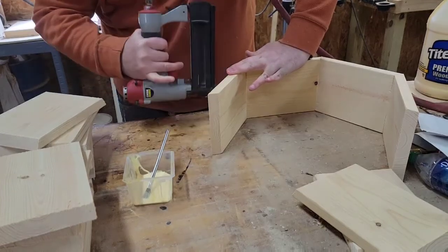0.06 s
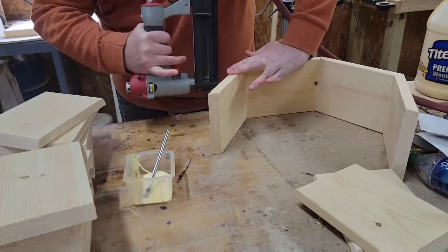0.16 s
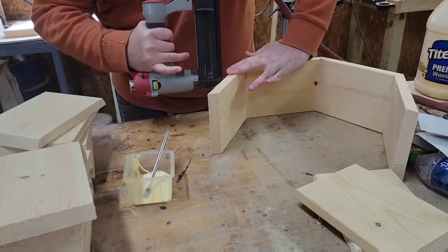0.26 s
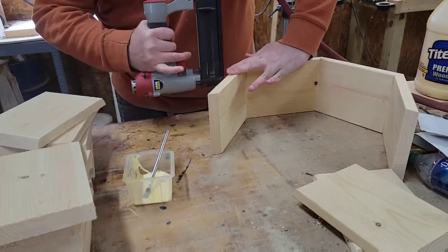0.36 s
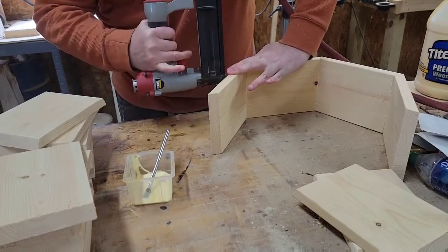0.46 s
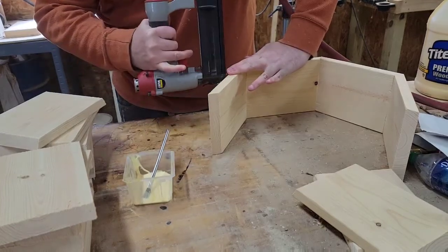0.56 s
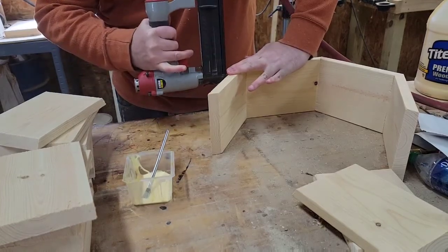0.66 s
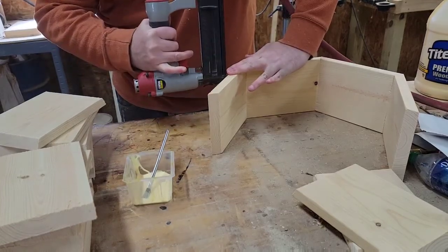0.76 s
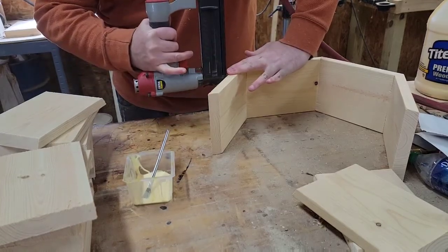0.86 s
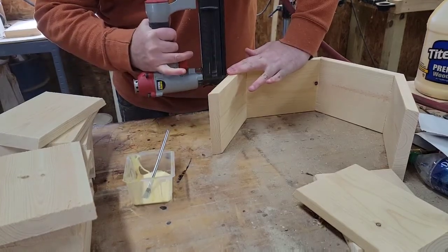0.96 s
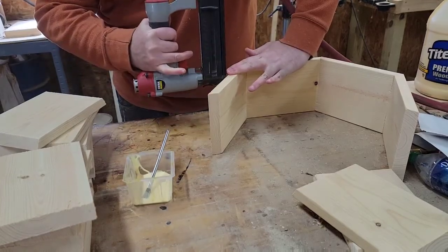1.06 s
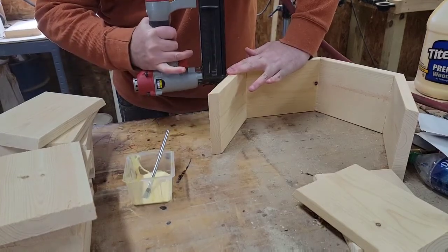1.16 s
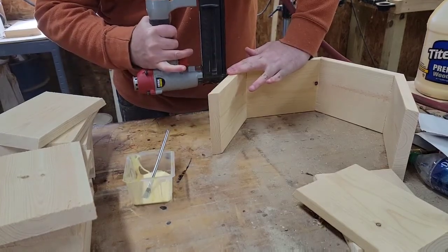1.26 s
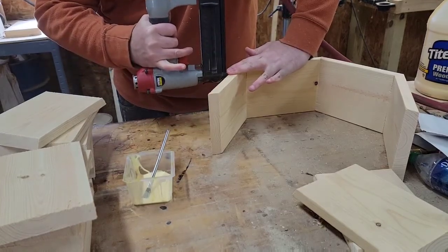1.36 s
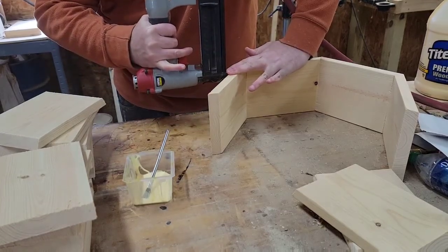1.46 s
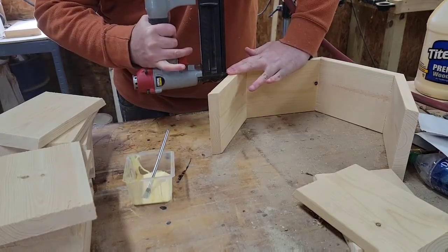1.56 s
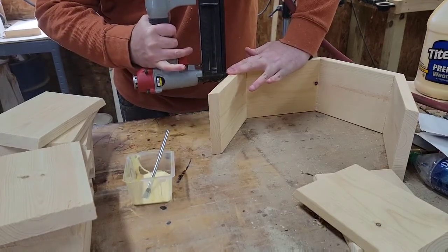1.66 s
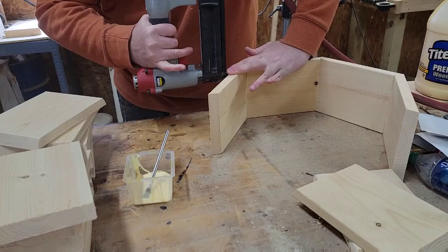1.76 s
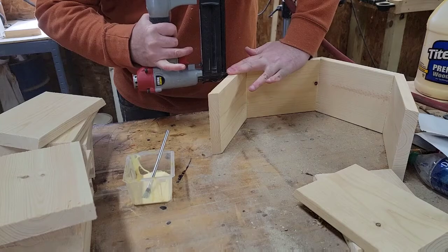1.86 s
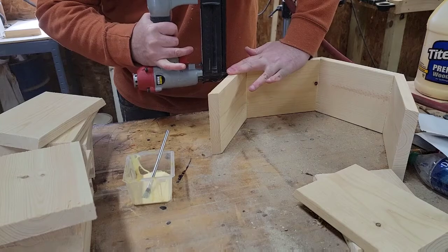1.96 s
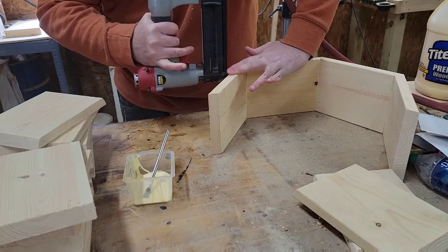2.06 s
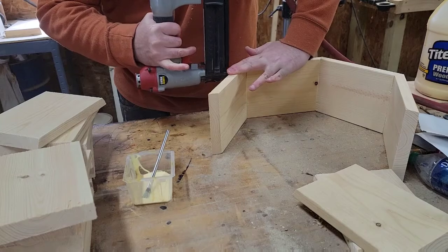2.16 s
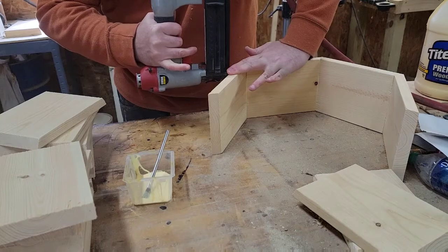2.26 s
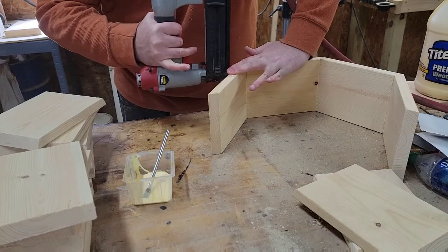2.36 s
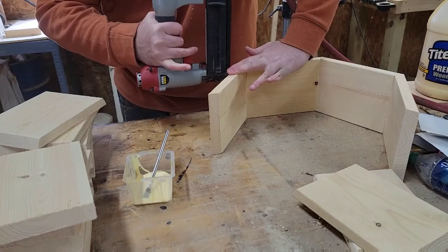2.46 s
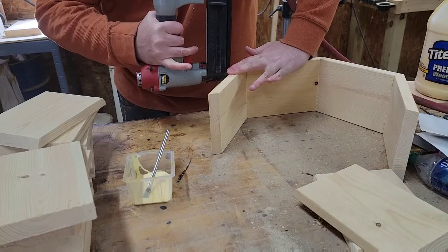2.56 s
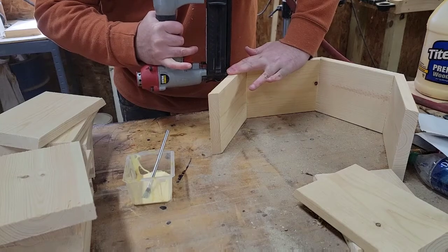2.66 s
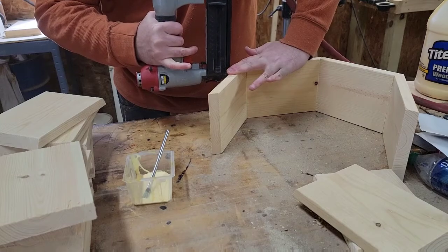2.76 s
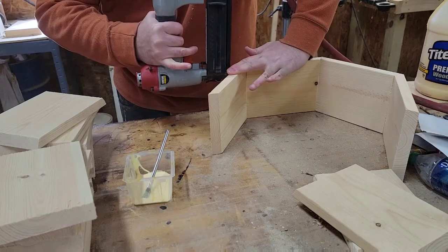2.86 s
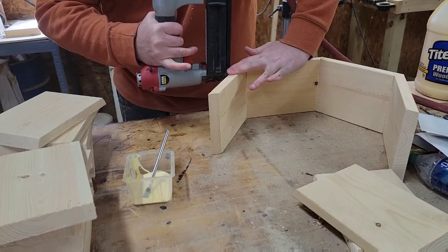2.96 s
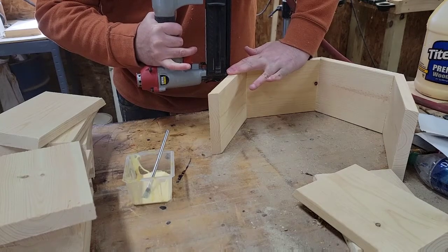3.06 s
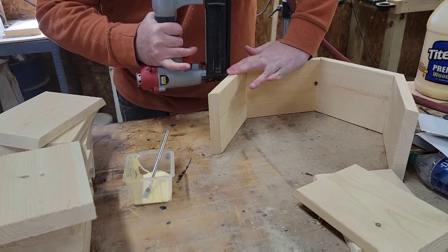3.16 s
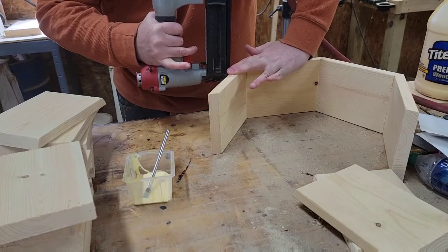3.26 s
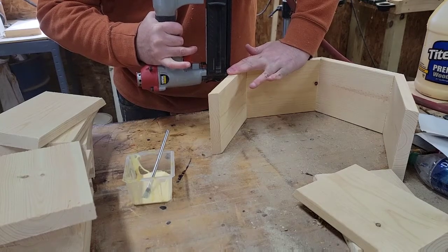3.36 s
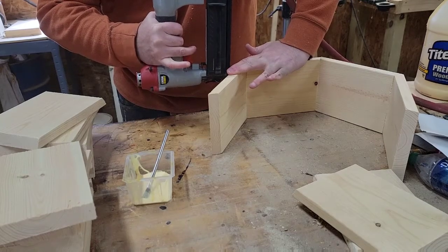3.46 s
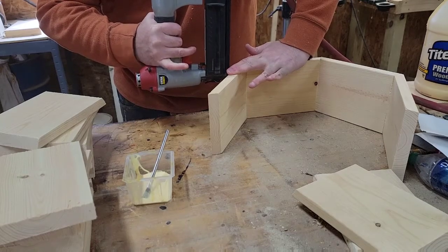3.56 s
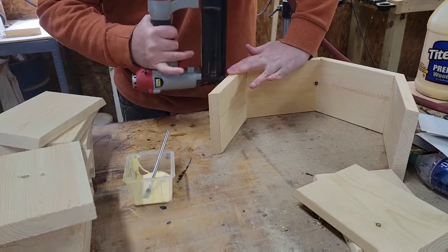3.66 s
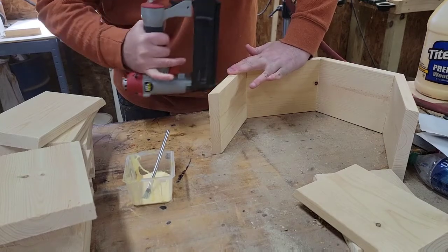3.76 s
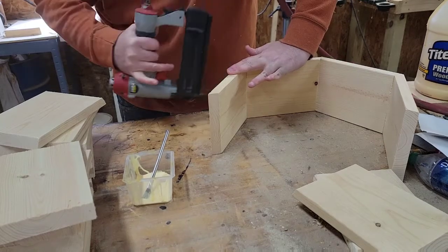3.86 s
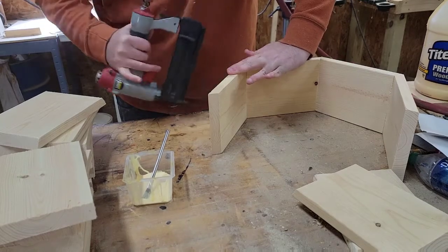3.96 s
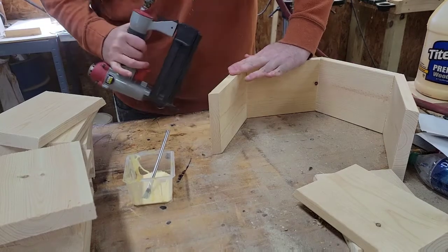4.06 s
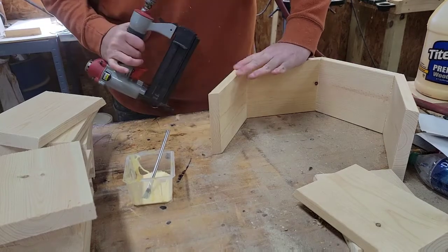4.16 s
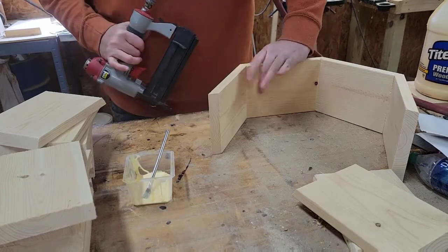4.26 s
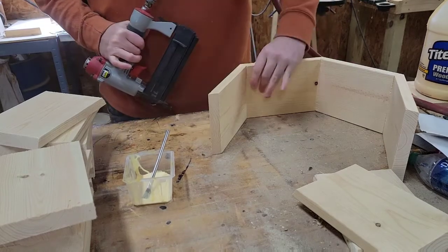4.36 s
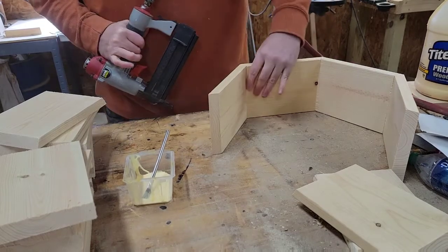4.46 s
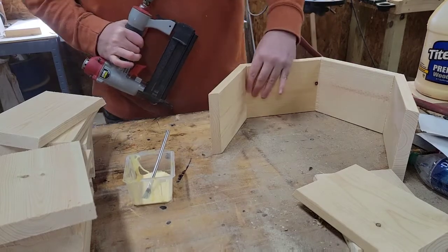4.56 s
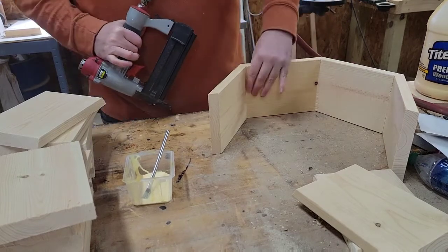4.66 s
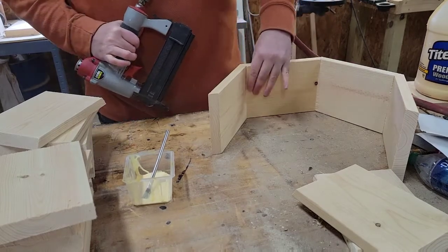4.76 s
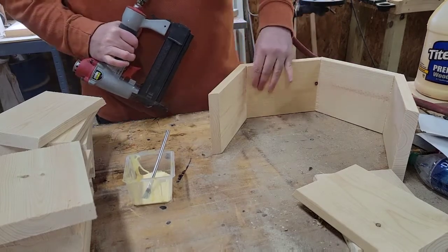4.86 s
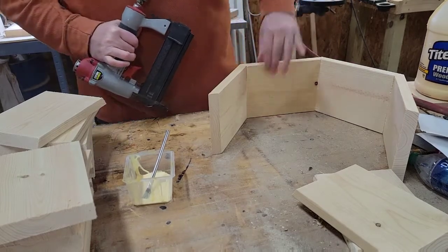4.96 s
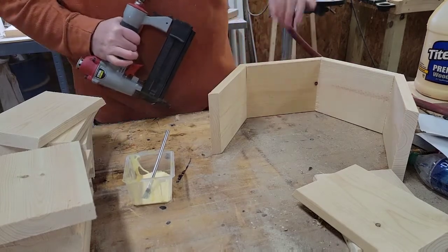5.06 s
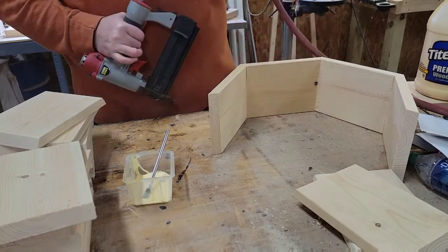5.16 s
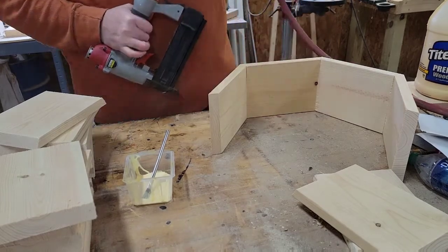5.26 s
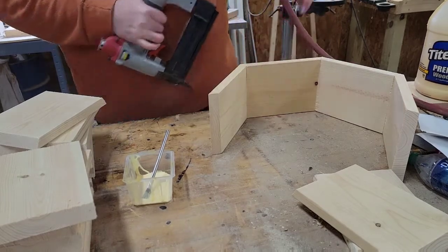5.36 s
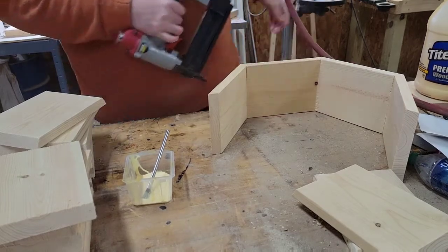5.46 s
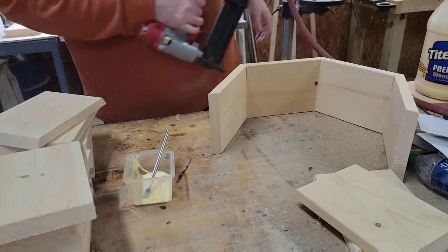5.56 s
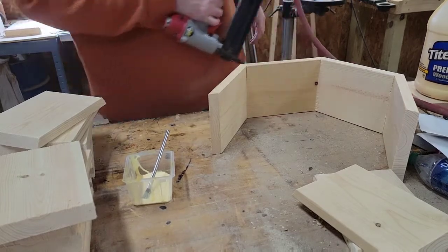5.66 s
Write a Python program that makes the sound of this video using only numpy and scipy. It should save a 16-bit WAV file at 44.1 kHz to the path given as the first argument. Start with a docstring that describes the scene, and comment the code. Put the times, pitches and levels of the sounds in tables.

```python
"""Pneumatic nailing in a reverberant workshop

An air nailer drives a brad into a pine box on a bench in a ringing workshop, as the shot before dies away.
Shaped noise forms the air at valve and exhaust; damped modes ring under the driver and the landing piston.
Between shots a jet of leaking air hisses and whistles, the nose taps the boards, and a hand brushes the wood.
Wall echoes and a decaying diffuse tail surround the impacts, over a low rumble of filtered noise."""
import sys
import numpy as np
from scipy import signal
from scipy.fft import rfft, irfft
from scipy.io import wavfile

SR = 44100
rng = np.random.default_rng(int(sys.argv[2]) if len(sys.argv) > 2 else 0)


def digitize_waveform(pressure):
    """Quantize a signal to 16-bit integers and store it at the path in sys.argv[1].

    Rows of a 2-D input are taken as channels; values are limited to [-1, 1].
    """
    field = np.atleast_2d(pressure).T
    bounded = np.clip(field, -1, 1)
    quanta = np.round(bounded * 32767).astype(np.int16)
    wavfile.write(sys.argv[1], SR, quanta)


N = 252252
TIME = np.arange(N) / SR
FREQS = np.fft.rfftfreq(N, 1 / SR)

# Levels are relative. Colours give spectral level in equal-width bands; noise is then scaled to unit rms.
# Strike tilts pivot at 1 kHz. T60 is the time to decay by 60 dB.

# air at the trigger valve: (full at [s], level [dB], attack [s], hold [s], release [s])
VALVE_AIR = (3.503, -13, .086, .004, .1)
# its colour: (frequency [Hz], level [dB])
VALVE_COLOUR = [(100, -8), (500, -16), (1400, -20.5), (3200, -13.5), (5200, -9), (6300, -5), (7500, -3),
                (9000, -7), (11500, -12), (14000, -9), (15200, -9)]
# the narrowest slits squeal: (full at [s], level [dB], attack [s], hold [s], release [s])
SLIT_SQUEALS = [(3.493, -17.8, .078, .008, .07), (3.682, -24, .044, .038, .03)]
# their colour: (frequency [Hz], level [dB])
SQUEAL_COLOUR = [(5000, -49.5), (11000, -22), (12600, -10.5), (14200, -10.5), (15200, -0.5), (16000, -7.5)]
# driver and nail strike the board: (time [s], level [dB], tilt [dB per octave])
DRIVER_BLOWS = [(3.5175, -12, 1.5), (3.5208, -6.5, 1.5), (3.5252, 5.6, 1), (3.5283, -8.5, 3.5),
                (3.5297, -4.5, 3.5)]
# modes of board and bench: (frequency [Hz], level [dB], T60 [s])
BOARD_MODES = [(92, -29, .15), (232, -27.5, .05), (317, -21.5, 0.03), (410, -19, .026), (546, -19.5, .034),
               (685, -20, 0.03), (756, -6.8, 0.016), (982, -7.5, 0.015), (1047, -19.5, .045),
               (1153, -26, 0.037), (1283, -18, .025), (1463, -20.5, 0.014), (1700, -20.5, .016),
               (2400, -20, 0.009), (3000, -21, .008), (3800, -15.5, 0.0075)]
# boards and tools around the bench ring on: (frequency [Hz], level [dB], T60 [s])
SYMPATHETIC_MODES = [(228, -43, .7), (546, -41, .7), (680, -39.5, .6), (769, -37, .55), (914, -34, .5),
                     (979, -30.5, .5), (1051, -29, .48), (1134, -31, .48), (1361, -34.5, .85),
                     (1438, -37.5, .8), (1657, -35, 1.0), (1986, -42, .9), (2503, -42, .8)]

# exhaust air, cut off as the piston lands: (full at [s], level [dB], attack [s], hold [s], release [s])
EXHAUST_AIR = (3.703, -12.6, .16, .013, .022)
# its colour: (frequency [Hz], level [dB])
EXHAUST_COLOUR = [(30, -10), (100, 0), (400, -4.5), (900, -2.5), (1600, 0.5), (2400, 0.5), (3700, -5),
                  (5200, -1), (7500, 0), (10000, -3.5), (13000, 2.5), (15200, 2.5)]
# valve and exhaust buffet the air: (time [s], height [dB])
AIR_PUFFS = [(3.504, -28), (3.6985, -20), (3.7138, -7.8)]
PUFF_S, PUFF_EDGE_S = .0033, .0018  # length of push and of suction; time to swing between them
# the piston knocks loose, lands on its stop and bounces: (time [s], level [dB], tilt [dB per octave])
PISTON_CLACKS = [(3.7053, -11, 2.5), (3.7183, 5.3, -.3), (3.7194, -3, 1.5), (3.7217, -6, 0)]
# modes of the metal tool body: (frequency [Hz], level [dB], T60 [s])
NAILER_MODES = [(267, -22.5, 0.021), (420, -19.5, 0.015), (1351, -24, 0.022), (1720, -15, 0.013),
                (2020, -19.5, .014), (2354, -16.5, 0.011), (2529, -34.5, 0.11), (2730, -14.5, .006),
                (3300, -16, 0.012), (3960, -28, 0.0079), (4400, -29, 0.016), (4810, -16, 0.017),
                (7150, -25, .012)]

# the nose is set on the box: (time [s], level [dB], tilt [dB per octave], thud of the bench [dB])
NOSE_TAPS = [(0.7606, -48.5, 3, -43), (0.7636, -45.5, 10.5, -62), (2.1995, -45, 4, -68),
             (2.9456, -46, -2.5, -70), (3.0117, -43, -2.5, -60)]
# the box rocks in soft contacts: (time [s], level [dB], tilt [dB per octave])
BOX_ROCKS = [(2.123, -64, -4), (2.189, -58, -6), (2.233, -63, -5), (2.277, -61, -5)]
# the nose skids: (full at [s], level [dB], attack [s], hold [s], release [s], tilt [dB per octave])
NOSE_SLIDES = [(0.768, -59, .02, .008, .14, 6.5), (2.2, -67, .15, .08, .3, -3)]
CATCHES_PER_S = 500
# modes of the loose box: (frequency [Hz], level [dB], T60 [s])
BOX_MODES = [(273.3, -17, 0.15), (390, -3, .046), (436.5, -2.5, 0.048), (516, -18, 0.051), (870, -2.5, .02),
             (1130, -0.5, 0.02), (1310, -9.5, 0.025), (1900, -15, .02), (2366, -14, .015),
             (3120, -24, .012)]
# modes of the bench top: (frequency [Hz], level [dB], T60 [s])
BENCH_MODES = [(90, -8, .3), (155.6, -7, 0.13), (245, -1, .055), (344, -3.5, 0.068)]
# light ticks as the fingers leave a board: (time [s], level [dB], tilt [dB per octave])
FINGER_TICKS = [(4.479, -53, -4), (4.714, -67, 11)]
# modes of the rim: (frequency [Hz], level [dB], T60 [s])
RIM_MODES = [(848, -2, .04), (1020, 2, .03), (1380, 0, 0.032), (1597, 1, .025), (2870, -2, 0.012)]
# a hand slides over the wood: (full at [s], level [dB], attack [s], hold [s], release [s])
HAND_BRUSH = (5.05, -62, .3, .045, .26)
# its colour: (frequency [Hz], level [dB])
BRUSH_COLOUR = [(400, -25), (900, -11), (1150, 4), (1500, -8), (3000, -6), (6000, -22)]

# the leak's hiss swells near 3-4.5 kHz at the end: (full at [s], level [dB], attack [s], hold [s], release [s])
HISS_SWELL = (5.67, -58.5, 1.2, .1, .3)
# its colour: (frequency [Hz], level [dB])
HISS_SWELL_COLOUR = [(80, -8), (170, 11), (400, -11), (1500, -19), (2400, -4), (3500, 3), (4500, 6),
                     (8000, -15)]
# colour of the leaking jet: (frequency [Hz], level [dB])
LEAK_COLOUR = [(300, -21), (700, -14), (1200, -8), (1900, -9.3), (2850, -6.3), (3350, -2.8), (3900, -3.6),
               (4700, 3.3), (6200, 2.5), (8000, 1.2), (9600, 0.3), (12000, -0.3), (13500, 3.7),
               (15300, 2.7)]
# breathy whistles: (frequency [Hz], width scale [Hz], level [dB], extra share of the sag after a shot)
LEAK_WHISTLES = [(5380, 340, -9, 0), (6990, 260, -9.2, .2), (7710, 220, -14.5, .2), (12480, 240, -16, .8),
                 (14750, 260, -12, .5)]
# the tool is turned in the hand: (time [s], level [dB])
TURNING_LEVEL = [(4.95, 0), (5.25, 1.6), (5.48, -1), (5.7, .5)]
# the leak: level without sag, scale of its sag after a shot, time of the drop, time constant of recovery
LEAK_DB, SAG_DB, SAG_S, RECOVERY_S = -42.8, 14.8, .12, 1.15
# the tool is drawn back from the box: when, how long it takes, and the change in the leak
DRAW_BACK_AT_S, DRAW_BACK_S, DRAW_BACK_DB = 3.75, .25, -3.7
# tilt of the whistles with the tool at the box and drawn back (dB per octave)
NEAR_TILT_DB, AWAY_TILT_DB = 2, -6
BENCH_ECHO_M, HAND_SWAY_M = .32, .015  # extra path of the echo off the bench; rms sway in the hand

# low rumble of the shop: (time [s], level [dB])
RUMBLE_LEVEL = [(0, -65.5), (2.5, -60), (5.72, -60)]
# its colour: (frequency [Hz], level [dB])
RUMBLE_COLOUR = [(20, -19.5), (40, -12.5), (55, -1.5), (90, 1.2), (125, -8.5), (170, -22.5), (280, -18),
                 (450, -27), (900, -27.5), (3000, -44)]

# reverberation of the shop: (frequency [Hz], level [dB], T60 [s])
SHOP_REVERB = [(42, -10, .5), (72, 1, .58), (150, -10, 0.68), (250, 1, .82), (420, 3.2, .85),
               (720, -4.3, 1.03), (1120, 2.2, .97), (1380, 4.4, 1.0), (1720, 7.4, 1.08), (2500, 2.8, 1.04),
               (5000, 1.1, 0.93), (7200, -0.3, 0.72), (9750, -2, 0.57), (13000, -3, 0.58),
               (15000, -2.6, 0.6)]
# first echoes from the nearest walls: (left ear delay [s], right ear delay [s], level [dB])
WALL_ECHOES = [(.0191, .0186, -19), (.0272, .0277, -19), (.0452, .0447, -21)]
# left-right correlation of noise: (frequency [Hz], correlation [-1 to 1])
NOISE_CORRELATION = [(28, .1), (60, .85), (130, 0.88), (290, 0.4), (700, -0.3), (1300, -.35), (3000, -0.3),
                     (7000, -0.18), (15000, 0.05)]
# left-right correlation of reverberation: (frequency [Hz], correlation [-1 to 1])
SHOP_CORRELATION = [(28, 0), (60, .7), (130, .88), (290, .5), (700, -.3), (1100, -.62), (2000, -.45),
                    (4000, -.3), (8000, -.17), (15000, -.12)]

PREVIOUS_SHOT_LEAD_S, CUTOFF_HZ = 4.0, 15650


def drive_stroke(right_ear_lag_s=.00028):
    """Turbulence and impact: the valve spits air, then the driver's blows excite the board's modes."""
    valve = in_shop(burst(VALVE_AIR, VALVE_COLOUR), wet_db=-1)
    squeal = in_shop(sum(burst(row, SQUEAL_COLOUR) for row in SLIT_SQUEALS), wet_db=-12)
    blows = 0
    for blow in DRIVER_BLOWS:
        impact = strikes([blow], BOARD_MODES, crack_db=-11, crack_t60=.014, crack_hz=5500, spread=.55)
        blows = blows + in_shop(impact, wet_db=0, bloom_db=5, bloom_s=.08)
    right = np.interp(TIME - right_ear_lag_s, TIME, blows[1])
    return valve + squeal + np.array([blows[0], right])


def sympathy(build_s=.04, spread=1.05):
    """Sympathetic resonance: lightly damped modes swell after the hardest blow, out of step at the ears."""
    hardest = max(DRIVER_BLOWS, key=lambda blow: blow[1])
    t = np.maximum(TIME - hardest[0], 0)
    out = 0
    for hz, db, t60 in SYMPATHETIC_MODES:
        side = rng.choice([-1, 1]) * np.array([[1], [-1]])
        skew = spread * min(hz / 700, 1) * side
        phase = 2 * np.pi * (hz * t + rng.random()) + skew
        out = out + from_db(db - 60 * t / t60) * np.sin(phase)
    return np.sqrt(2) * out * (1 - np.exp(-t / build_s))


def return_stroke():
    """Venting and impact: exhaust turbulence and pressure puffs, then the piston rings the metal body."""
    exhaust = in_shop(burst(EXHAUST_AIR, EXHAUST_COLOUR), wet_db=-4.7)
    buffets = in_shop(puffs(), wet_db=-6)
    clacks = 0
    for clack in PISTON_CLACKS:
        impact = strikes([clack], NAILER_MODES, crack_db=-5.5, crack_t60=.0065, crack_hz=7000,
                         spread=.93, contact_s=.0002)
        clacks = clacks + in_shop(impact, wet_db=-2.4)
    return exhaust + buffets + clacks


def puffs(ear_shift_s=.0004, lowest_hz=72):
    """Volume-flow radiation: each push is followed by suction, and a small port radiates no deep bass."""
    t = TIME + np.array([[ear_shift_s], [-ear_shift_s]])  # the left ear hears it first
    pressure = 0
    for s, db in AIR_PUFFS:
        swing = -np.tanh((t - s) / PUFF_EDGE_S)
        pressure = pressure + from_db(db) * swing * np.exp(-((t - s) / PUFF_S) ** 2)
    high_pass = signal.butter(2, lowest_hz, "high", fs=SR, output="sos")
    return signal.sosfilt(high_pass, pressure + 1e-18)


def handling():
    """Contact and friction: the nose jolts box and bench; later the free hand lets go and brushes the wood."""
    nose = [(s, db, tilt) for s, db, tilt, thud in NOSE_TAPS]
    jolts = [(s, thud, 0) for s, db, tilt, thud in NOSE_TAPS]
    taps = strikes(nose + BOX_ROCKS, BOX_MODES, crack_db=-16, crack_t60=.018, crack_hz=4000, spread=.26)
    thuds = strikes(jolts, BENCH_MODES, crack_db=-24, crack_t60=.04, crack_hz=3000, spread=.3)
    ticks = strikes(FINGER_TICKS, RIM_MODES, crack_db=-14, crack_t60=.015, crack_hz=4000, spread=.84)
    contacts = in_shop(taps + thuds + ticks + slides(), wet_db=-11)
    return contacts + burst(HAND_BRUSH, BRUSH_COLOUR)


def slides():
    """Stick-slip friction: the nose slips over the wood in many tiny uneven catches that ring the box."""
    out = 0
    for *event, tilt in NOSE_SLIDES:
        catches = (rng.random(N) < CATCHES_PER_S / SR) * rng.standard_normal(N)
        catch = strikes([(0, 0, tilt)], BOX_MODES, crack_db=-12, crack_t60=.01, crack_hz=3500, spread=.4)
        friction = signal.fftconvolve(catches[None], catch, axes=1)[:, :N]
        out = out + envelope(*event) * rms_one(friction)
    return out


def leak(hiss_db=-2.6, flutter_db=.62, whistle_flutter_db=1.5, swell_db=.6, waver=.007, wander=.005,
         echo_db=-13):
    """Jet noise: a thin jet hisses and sings with a bench echo; drawn back, it is softer and duller."""
    away = np.clip((TIME - DRAW_BACK_AT_S) / DRAW_BACK_S, 0, 1)
    tilt = NEAR_TILT_DB * (1 - away) + AWAY_TILT_DB * away
    sag = sag_db()
    jet = from_db(hiss_db) * coloured(LEAK_COLOUR)
    for hz, width, db, sags in LEAK_WHISTLES:
        pitch = hz * (1 + waver * drift(8) + wander * drift(1.2))
        phase = 2 * np.pi * np.cumsum(pitch) / SR
        lean = tilt * np.clip(np.log2(hz / 5800), -.5, .5)
        unsteady = whistle_flutter_db * drift(25) + swell_db * drift(3)
        jet = jet + narrow(phase, width) * from_db(db + lean - sags * sag + unsteady)
    late = TIME - (BENCH_ECHO_M + HAND_SWAY_M * drift(.5)) / 343  # speed of sound, m/s
    jet = jet + from_db(echo_db) * np.array([np.interp(late, TIME, ear) for ear in jet])
    loudness_db = LEAK_DB - sag + DRAW_BACK_DB * away + flutter_db * drift(32)
    return jet * level(TURNING_LEVEL) * from_db(loudness_db)


def hiss_swell():
    """Jet noise: at the end the leak's hiss swells near 3-4.5 kHz, as coloured noise under an envelope."""
    return burst(HISS_SWELL, HISS_SWELL_COLOUR)


def sag_db():
    """Relaxation: the hiss sinks quickly at each shot, then recovers exponentially."""
    leads = np.array([[0], [PREVIOUS_SHOT_LEAD_S]])
    since = np.maximum(TIME - VALVE_AIR[0] + leads, 0)
    return SAG_DB * np.sum(np.minimum(since / SAG_S, 1) * np.exp(-since / RECOVERY_S), axis=0)


def narrow(phase, width_hz):
    """Quadrature modulation: low-passed stereo noise is carried to a moving pitch."""
    half_width_hz = width_hz * .92  # half power this far either side of the pitch
    band = 1 / (1 + (FREQS / half_width_hz) ** 4) ** .5
    a, b = irfft(rfft(rng.standard_normal((2, 2, N))) * band, N)
    return rms_one(a * np.cos(phase) + b * np.sin(phase))


def rumble():
    """Broadband background: bass-heavy noise follows a slow level curve."""
    return level(RUMBLE_LEVEL) * coloured(RUMBLE_COLOUR)


def in_shop(x, wet_db, bloom_db=1.1, bloom_s=.08):
    """Superposition of direct and reverberant sound: a fresh diffuse tail each call, fixed wall echoes."""
    sounding = np.flatnonzero(np.abs(x[0]) > 1e-9)
    first, last = sounding[0], sounding[-1]
    response = shop_response(bloom_db, bloom_s)
    tail = signal.fftconvolve(x[:, first:last + 1], response, axes=1)[:, :N - first]
    tail = np.pad(tail, ((0, 0), (first, N - first - tail.shape[1])))
    return x + from_db(wet_db) * tail


def shop_response(bloom_db, bloom_s, gap_s=.018, build_s=.003, early_db=-11, grain_db=2.6, grain_s=.2,
                  size=65536, count=16):
    """Room impulse response: weak bench echoes, wall slaps, then a clumpy tail that decays by bands."""
    t, bins, out = TIME[:size], np.fft.rfftfreq(size, 1 / SR), 0
    field = stereo_spectrum(size, SHOP_CORRELATION) * from_db(at_hz(SHOP_REVERB, bins)) / np.sqrt(2)
    centres = np.geomspace(60, 15000, count)
    for hz, weights in zip(centres, np.eye(count)):
        band = irfft(field * np.interp(bins, centres, weights), size)  # overlapping bands
        out = out + band * from_db(-60 * t / at_hz(SHOP_REVERB, hz, axis=2))
    walls = .5 + .5 * np.tanh((t - gap_s) / build_s)
    onset = walls + from_db(early_db) * (1 - walls)
    far_walls = from_db(bloom_db * np.minimum(t / bloom_s, 1) ** 2)  # their echoes join in later
    clumps = from_db(grain_db * np.exp(-t / grain_s) * (drift(450, size) - .3))
    out = out * clumps * far_walls * onset / np.sqrt(SR / 10)
    for left_s, right_s, db in WALL_ECHOES:
        out[[0, 1], [round(left_s * SR), round(right_s * SR)]] += from_db(db)
    return out


def strikes(events, modes, crack_db, crack_t60, crack_hz, spread, contact_s=.00046, size=8192):
    """Modal excitation: each contact cracks and rings damped modes; tilt sets their treble balance."""
    out, t = np.zeros((2, N + size)), np.arange(size) / SR
    hz, mode_db, t60 = np.transpose(modes)[:, :, None]
    crack_edges = [1500, np.clip(crack_hz, 3000, 18000)]
    crack_band = signal.butter(1, crack_edges, "band", fs=SR, output="sos")
    # higher modes reach the two ears further out of step, up to 1 kHz (radians)
    skew = spread * np.minimum(hz / 1000, 1) * (-1) ** np.arange(len(hz))[:, None]
    for s, db, tilt in events:
        height = from_db(mode_db + tilt * np.log2(hz / 1000) - 60 * t / t60)
        phase = 2 * np.pi * hz * t
        ring = np.array([np.sum(height * np.sin(phase + ear * skew), axis=0) for ear in (1, -1)])
        ring = ring * (1 - np.exp(-t / contact_s))  # the force takes a moment to build
        grit = rng.standard_normal((2, size)) * from_db(-60 * t / crack_t60)
        crack = from_db(crack_db + 2 * tilt) * signal.sosfilt(crack_band, grit)
        start = round(s * SR)
        out[:, start:start + size] += from_db(db) * (ring + crack)
    return out[:, :N]


def burst(event, colour):
    """Amplitude modulation: coloured noise under an attack, hold and release."""
    return envelope(*event) * coloured(colour)


def envelope(full_s, db, attack_s, hold_s, release_s):
    """Exponential growth and decay: 60 dB up over the attack, a hold, 60 dB down over the release."""
    before = np.maximum((full_s - TIME) / attack_s, 0)
    after = np.maximum((TIME - full_s - hold_s) / release_s, 0)
    below = before + after
    return from_db(db - 60 * below) * (below < 1)


def coloured(colour):
    """Spectral shaping: stereo noise of unit rms with a (frequency [Hz], level [dB]) spectrum."""
    return rms_one(irfft(from_db(at_hz(colour, FREQS)) * stereo_spectrum(N, NOISE_CORRELATION), N))


def stereo_spectrum(size, correlation):
    """Interaural correlation: mid and side noise mixed to a left-right likeness at each frequency."""
    alike = np.clip(at_hz(correlation, np.fft.rfftfreq(size, 1 / SR)), -1, 1)
    mid, side = rfft(rng.standard_normal((2, size)))
    return np.sqrt(1 + alike) * mid + np.sqrt(1 - alike) * side * [[1], [-1]]


def drift(rate_hz, size=N):
    """Random fluctuation: low-passed noise with unit rms."""
    slow = 1 / (1 + (np.fft.rfftfreq(size, 1 / SR) / rate_hz) ** 2)
    return rms_one(irfft(rfft(rng.standard_normal(size)) * slow, size))


def level(rows):
    """Level curve: gain through time from (time [s], level [dB]) rows."""
    s, db = np.transpose(rows)
    return from_db(np.interp(TIME, s, db))


def at_hz(points, hz, axis=1):
    """Logarithmic frequency scale: one column of a table interpolated along it."""
    table = np.array(points)
    return np.interp(np.log(hz + 1), np.log(table[:, 0]), table[:, axis])


def to_left(x, db):
    """Interaural level difference: the left gain exceeds the right by db."""
    return x * from_db([[db / 2], [-db / 2]])


def from_db(db):
    """Decibel law: level to amplitude gain."""
    return 10 ** (np.asarray(db) / 20)


def rms_one(x):
    """Normalization: scale to unit rms."""
    return x / np.sqrt(np.mean(x ** 2) + 1e-20)


def scene(earlier_drive_db=1.2, earlier_return_db=-2.2, earlier_ring_db=-4, earlier_low_cut_hz=200):
    """Superposition: a shot, the bass-thinned tail of an earlier one, handling, leak and rumble."""
    drive, rings, back = drive_stroke(), sympathy(), return_stroke()
    earlier = from_db(earlier_drive_db) * drive
    earlier = earlier + from_db(earlier_ring_db) * rings + from_db(earlier_return_db) * back
    thin = signal.butter(1, earlier_low_cut_hz, "high", fs=SR, output="sos")
    lead = round(PREVIOUS_SHOT_LEAD_S * SR)
    dying = np.pad(signal.sosfilt(thin, earlier)[:, lead:], ((0, 0), (0, lead)))
    shots = to_left(drive + rings + back + dying, db=.6)
    near = to_left(handling() + hiss_swell(), db=2.4)
    return shots + near + to_left(leak(), db=3.3) + rumble()


def record(dry, low_cut_hz=25, top=.92):
    """Band limiting and saturation: deep bass is lost, high peaks are rounded and the top is cut."""
    high_pass = signal.butter(1, low_cut_hz, "high", fs=SR, output="sos")
    sound = signal.sosfilt(high_pass, dry)
    rounded = top * np.tanh(sound / top)
    low_pass = signal.ellip(12, .1, 80, CUTOFF_HZ, fs=SR, output="sos")
    return signal.sosfilt(low_pass, rounded)


dry = scene()
out = record(dry)
digitize_waveform(out)
```